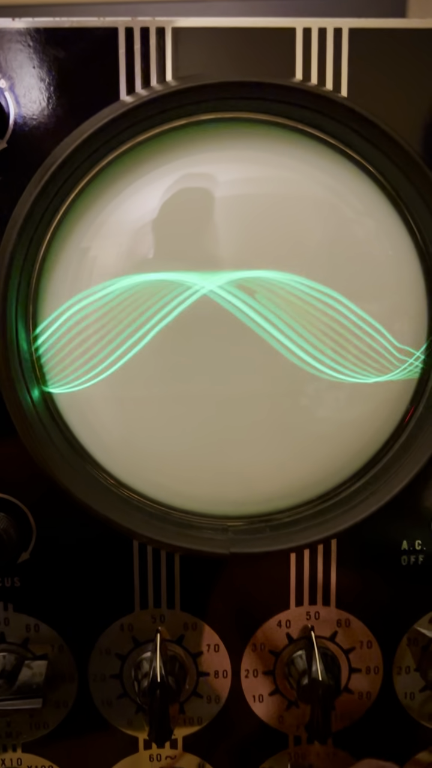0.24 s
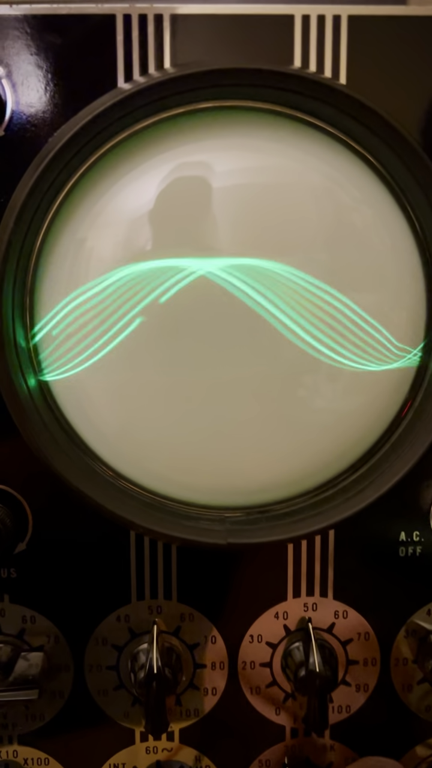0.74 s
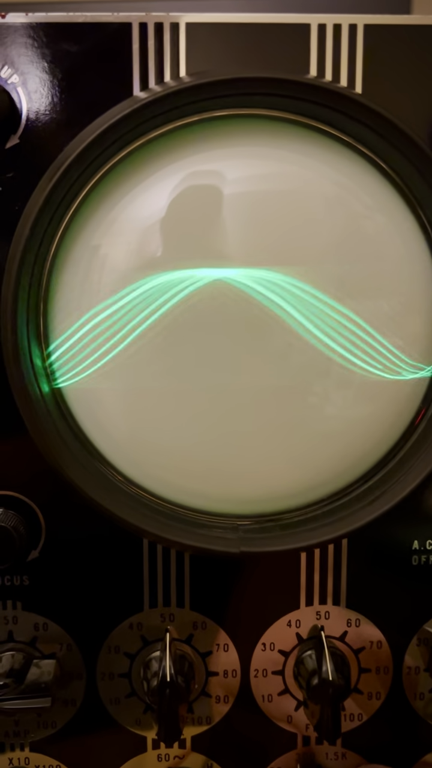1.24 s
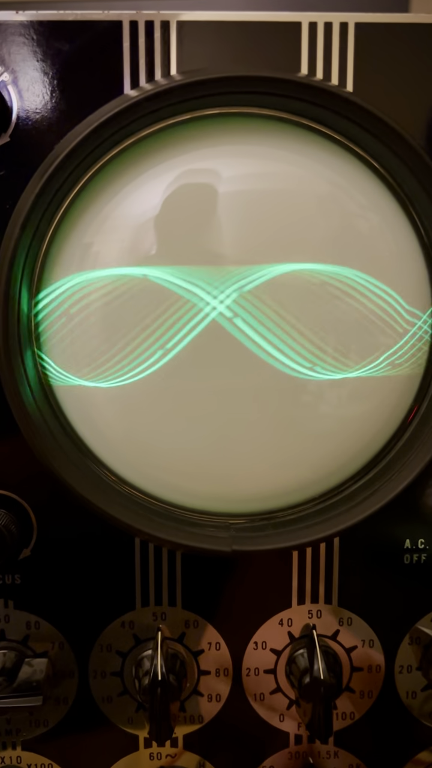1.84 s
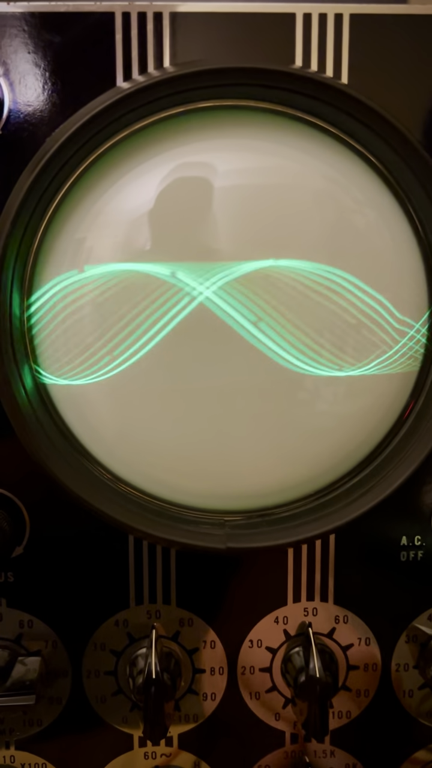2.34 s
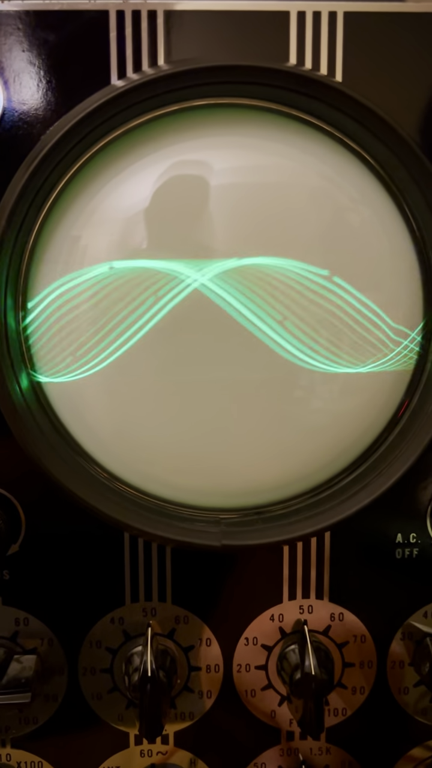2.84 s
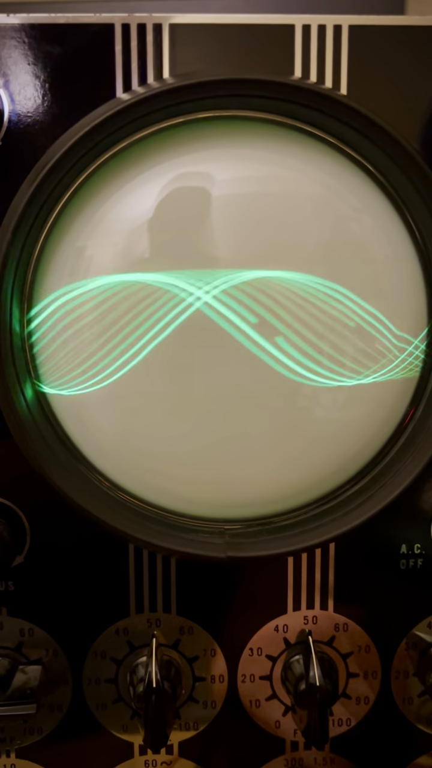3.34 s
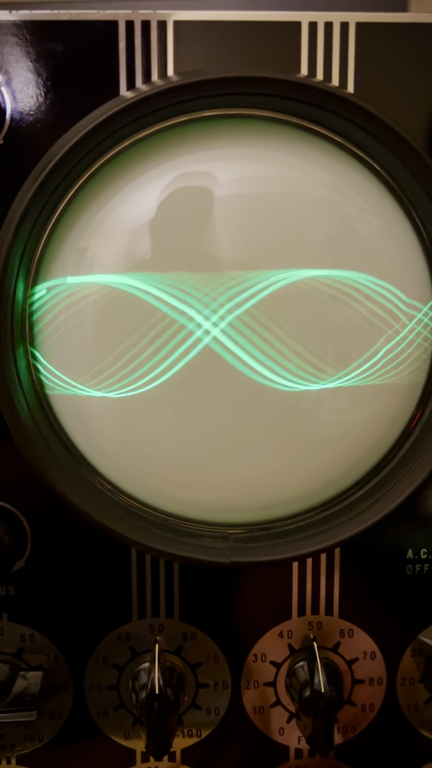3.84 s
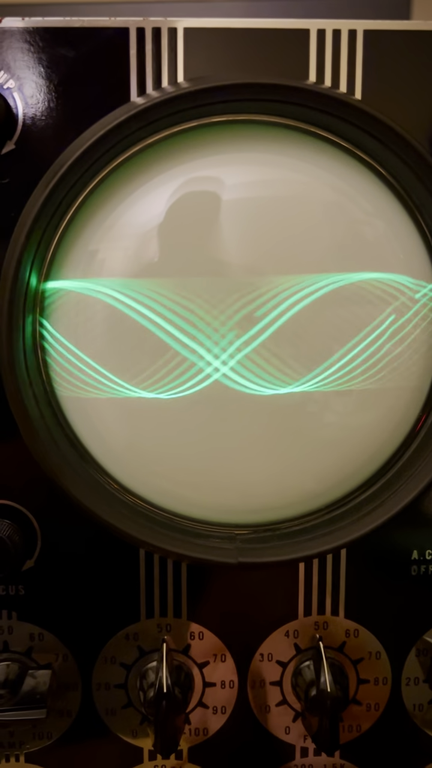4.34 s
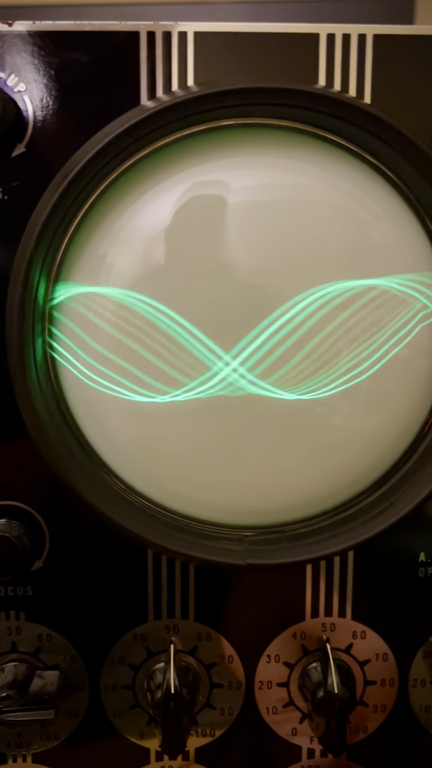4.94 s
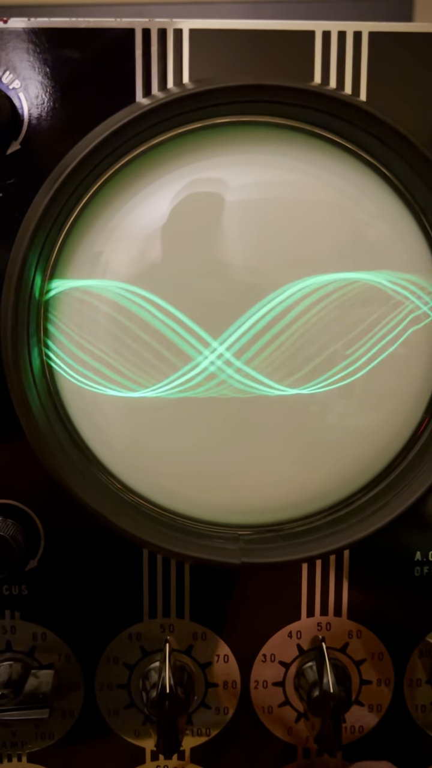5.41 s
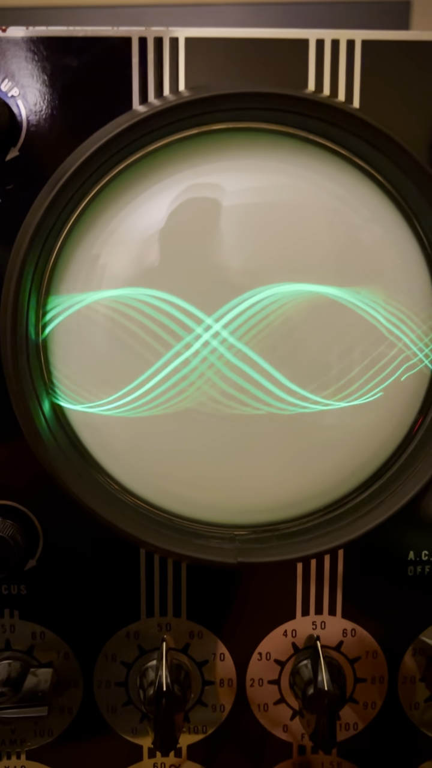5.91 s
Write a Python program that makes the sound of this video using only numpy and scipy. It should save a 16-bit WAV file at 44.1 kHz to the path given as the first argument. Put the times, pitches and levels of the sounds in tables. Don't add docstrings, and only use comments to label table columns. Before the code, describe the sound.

Close, dry clicks and hard snaps from a stubborn control knob, with faint taps, thuds and cloth rubs in a hushed indoor workshop.

```python
import sys
import numpy as np
from scipy import signal
from scipy.fft import rfft, irfft
from scipy.io import wavfile
from scipy.ndimage import uniform_filter1d

SR = 44100
rng = np.random.default_rng(int(sys.argv[2]) if len(sys.argv) > 2 else 0)


def voltage_ratio(decibels):
    exponent = np.asarray(decibels, float) / 20
    return 10 ** exponent


def wav_out(sig):
    wavfile.write(sys.argv[1], SR, np.round(np.clip(np.atleast_2d(sig).T, -1, 1) * 32767).astype(np.int16))


N = 272097

# f/Hz, level/dB per Hz
FLOOR_COLOUR = [(25, -14.5), (60, -10), (160, -5.5), (250, -9), (300, -9), (330, -23), (365, -13.5),
                (450, -32.5), (640, -26.5), (900, -37), (1300, -36), (2700, -43.5), (5000, -49),
                (7500, -47), (10500, -55.5), (13300, -56.5), (14600, -78.5)]
# t/s, level/dB
RUMBLE = [(0.0, -58), (0.38, -64.5), (0.62, -59.5), (1.13, -66), (1.58, -63.5), (2.44, -62.5), (2.71, -66),
          (2.92, -62), (3.49, -61), (3.78, -63.5), (4.78, -63), (5.57, -65.5), (6.03, -66.5), (6.17, -59)]
# t/s, level/dB
WHINE = [(0, -108), (1.5, -106), (1.8, -95), (3.0, -92), (3.4, -106), (6.17, -108)]
WHINE_HZ, HISS_DB = 7400, -76.5
# f/Hz, likeness/share
FLOOR_LIKENESS = [(60, 1), (130, 0.91), (290, 0.88), (640, -0.87), (1410, 0.35), (3100, -0.44),
                  (6820, 0.022), (15000, 0.94)]
# f/Hz, time to fall 60 dB/s
ROOM_DECAY = [(60, 0.7), (250, 0.46), (700, 0.19), (2500, 0.26), (7000, 0.2), (14000, 0.13)]
# f/Hz, likeness/share
ROOM_LIKENESS = [(60, 0.98), (180, 1), (550, 0.23), (1650, 0.99), (4970, 0.27), (15000, 0.14)]

# t/s, peak/dB, treble/dB, low body/dB, nearness to the edge/dB
TICKS = [(0.001, -53.5, -10.5, -23, -2), (0.425, -48, -13, 1.5, -1), (0.474, -47.5, -9.5, -13, 1.5),
         (0.516, -50, -11, -3, 2.5), (0.64, -47.5, -11.5, -7, 3), (0.691, -49, -12, -7.5, 1),
         (2.064, -49.5, -13, -1, 7), (3.565, -47, -13.5, -8, 2), (3.604, -51.5, -13.5, -26, 3),
         (3.681, -50, -15, -15, 1)]
# f/Hz, width/Hz, level/dB
HOUSING = [(234, 67, 9), (816, 55, 7.5), (1462, 63, -1), (1691, 40, 9), (2180, 115, -2), (2586, 24, -0.5),
           (3260, 290, -9.5), (3640, 47, 2), (4720, 73, 0), (5340, 1200, -15.5), (5870, 190, -12),
           (6660, 180, -3), (9460, 79, -11.5), (10000, 240, -32)]
EDGE_GAIN = [0, .5, 0, -1, 1, 0, .5, 0, -.7, 0, 0, -.3, 0, 0]
# f/Hz, level/dB
CLICK = [(200, 1), (500, 3.5), (1500, -12), (3300, -5.5), (5300, -12.5), (7500, -32.5), (11000, -18.5),
         (14000, -28.5), (16000, -33.5)]

# start t/s, hardest t/s, end t/s, shell level/dB,
# gritty treble against the shell/dB
CREAKS = [(0.11, 0.11, 0.175, -74, -31), (0.196, 0.39, 0.38, -74, -17), (1.454, 1.45, 1.5, -82, -20),
          (1.505, 1.67, 1.575, -55.5, -24), (1.531, 1.58, 1.61, -47, -19.5), (2.889, 3.1, 2.93, -71, -28),
          (2.919, 3.5, 3.0, -75, -13), (3.05, 3.177, 3.19, -72, -30), (3.198, 3.25, 3.235, -40, -13),
          (3.8, 3.8, 3.9, -75.5, -13.5), (3.839, 4, 4.01, -65, -28), (4.002, 4.1, 4.09, -69.5, -26),
          (4.479, 4.7, 4.525, -72.5, -19), (4.96, 6.9, 5.03, -91, -4), (4.533, 4.69, 4.63, -45, -21),
          (4.616, 4.627, 4.632, -30, -13.5), (4.977, 5.1, 5.095, -73.5, -25),
          (5.095, 5.2, 5.19, -67.5, -27), (5.19, 5.4, 5.3, -78, -19.5), (5.735, 5.83, 5.79, -49, -8.5),
          (5.767, 5.32, 5.79, -39.5, -16), (6.04, 6.09, 6.1, -55.5, -16), (6.058, 6.08, 6.15, -47.5, -23)]
# f/Hz, width/Hz, level/dB
SHELL = [(1045, 60, -8), (2430, 190, -3), (2725, 150, -4), (2110, 60, -10), (2875, 80, -13),
         (3110, 80, -19)]
# f/Hz, level/dB
HOLLOW = [(1200, -11.5), (2100, 0), (2900, -2), (3300, -7), (4200, -11)]
# f/Hz, width/Hz, level/dB
GRIT = [(4230, 120, 2), (4100, 41, -7), (6390, 170, 2), (6270, 170, -3), (6940, 990, -6.5),
        (9100, 460, -13), (10800, 68, -8), (12900, 80, -3.5), (13000, 160, -13)]
# f/Hz, level/dB
CRACK = [(300, -11.5), (700, -6.5), (1500, -7.5), (3000, -3.5), (3700, 3.5), (4500, 0), (6000, -6.5),
         (11000, -11.5), (14000, -15), (16000, -13.5)]
# f/Hz, width/Hz, level/dB
BENCH = [(55.74, 18, -15), (100, 33, -2.5), (165, 100, -8), (180, 42, -1), (272, 27, -4), (330.7, 24, -1),
         (500, 54, -9), (704, 430, -21.5), (1030, 160, -17.5), (1380, 1400, -17.5)]
# f/Hz, level/dB
KNOB_ROOM_COLOUR = [(1800, 0.5), (2430, -2.5), (3050, 2.5), (3700, 1.5), (4800, -2.5)]
REST_DB, BUILD, EASE = -95, 0.59, 0.36
PUSH_DB, PUSH_SHRINK = 1.5, 0.1
WAKE_DB, WAKE_SLOPE = -59, 4
LEAN_HZ, LEAN_SPAN_HZ = 2570, 170

# t/s, peak/dB, f/Hz
KNOCKS = [(0.125, -66.5, 500), (0.14, -58.5, 168), (0.738, -50, 61.9), (0.815, -48, 86),
          (1.076, -39, 168.7), (2.713, -46.5, 116.4), (2.877, -47.5, 165), (3.24, -45, 68.4),
          (3.38, -49, 255.3), (4, -57.5, 76.06), (4.632, -44, 100.6), (5.801, -40, 148.3),
          (5.832, -42.5, 58), (6.112, -51, 79.4)]
KNOCK_T60_S = 0.13

# start t/s, hardest t/s, end t/s, level/dB
RUBS = [(0.231, 0.262, 0.42, -78.5), (0.275, 0.42, 0.42, -76.5), (3.804, 3.842, 4.0, -96),
        (3.858, 4.018, 4.2, -87), (4.211, 4.234, 4.29, -84.5), (4.965, 5.016, 5.1, -105)]
# f/Hz, width/Hz, level/dB
RIM = [(1500, 680, -19.5), (3370, 930, -17), (4260, 140, -7), (6130, 210, -20)]
# start t/s, hardest t/s, end t/s, level/dB
DRAGS = [(3.498, 3.53, 3.55, -62), (4.232, 4.245, 4.268, -63), (4.289, 4.325, 4.4, -71)]
# f/Hz, width/Hz, level/dB
WOOD = [(523, 77, 2), (800, 140, -6.5), (1110, 130, -4.5), (1416, 170, -8), (1640, 100, -5),
        (2366, 110, -26.5)]
# f/Hz, level/dB
CLOTH = [(1700, 0), (2100, -13), (4000, -25.5)]
DRAG_BUILD, DRAG_EASE = 0.29, 0.71

# t/s, peak/dB, ring f/Hz, edge above 1 kHz/dB, thud/dB
TAPS = [(0.3717, -42, 532, -23, -16), (1.077, -50, 500, -23, 2.5), (1.46, -53.5, 360, -21, 0),
        (2.715, -53, 680, -12.5, 11), (2.82, -39.5, 340, -14.5, -11.5), (2.887, -42, 504, -9, -2),
        (2.932, -55.5, 397, -8, -21), (3.061, -43, 475, -8.5, -3.5), (4.228, -59.5, 515, -26, 8.5)]
CONTACT_MS = 0.68

# t/s, peak/dB, f/Hz
CATCHES = [(0.372, -53.5, 860), (0.375, -49.5, 1520), (3.495, -54, 590), (3.501, -56, 580),
           (3.509, -54.5, 1570), (3.527, -50, 1080), (3.536, -52, 1550), (4.234, -50, 1558),
           (4.248, -50.5, 1080), (4.29, -60, 1550), (4.311, -62.5, 1550), (4.319, -60.5, 1400),
           (4.343, -63, 1550)]
CATCH_WIDTH_HZ = 60

# t/s, peak/dB, treble crack against it/dB, thud/dB, lean to upper shell modes/dB
SNAPS = [(1.1105, -56.5, -28, -8, -5), (1.130, -51.5, -13, -2, -6), (1.459, -62, -32, 1, 6),
         (1.547, -57, -22, -14, 2), (1.569, -57, -24, -3, -2), (1.584, -44.5, -8, 3, 0),
         (1.5914, -31.5, -25, -27, 12), (1.599, -32.5, -39, -12.5, 7), (1.6066, -39, -28, -25, 1.5),
         (2.91, -52.5, -15, -3.5, 5), (3.194, -68, -52, -28, 8), (3.21, -44, -21, -22.5, 3),
         (3.2221, -32, -11, -10, -6), (3.2259, -25.5, -17, -5.5, -3), (3.2335, -27.5, -2, -6.5, -3.5),
         (3.2362, -28.5, -23, -19, -1), (4.580, -44.5, -13.5, -8, 0.5), (4.6198, -33, -29.5, -8.5, -5.5),
         (4.6252, -23.5, -26, -16.5, -1), (4.6275, -14.5, -13, -13, 0.5), (4.6294, -12, -26.5, -19, -0.5),
         (5.556, -54.5, -4, -8, -0.5), (5.7613, -39, -8, -10, -3), (5.7841, -16, -30, -27.5, 1),
         (5.779, -37.5, -12, -23.5, -4), (5.7874, -27.5, -18, -14, 1), (5.791, -30.5, -23, -5.5, 2),
         (6.062, -47.5, -11.5, -11, 2.5), (6.0929, -44, -8, -3, 5), (6.1005, -35, -13, -7.5, 4)]
SLIP_MS, SLIP_MS_PER_DB = 2.6, .04
BLOW, BLOW_SLOPE = 1.71, 0.49
GIVE_S = 0.00065

# start t/s, hardest t/s, end t/s, level/dB
SQUEAKS = [
    (1.518, 1.7, 1.59, -62),
    (3.193, 3.197, 3.205, -53.5),
    (3.208, 3.216, 3.222, -43),
    (5.742, 6.4, 5.772, -61),
    (2.907, 2.912, 2.88, -66.5),
]
# f/Hz, width/Hz, level/dB
SINGING = [(2740, 50, -4.5), (2430, 100, -8.5), (2930, 60, -10), (4250, 200, -24.5), (6800, 500, -23)]
# t/s, peak/dB, f/Hz, width/Hz
JOLTS = [(1.571, -54, 384, 50), (1.584, -44, 341, 50), (1.607, -52, 331, 40), (1.588, -47, 550, 70),
         (1.602, -50, 4600, 120), (3.2205, -37.5, 1300, 250), (3.223, -46, 1035, 40),
         (3.226, -36, 345, 44.7), (3.228, -40.5, 506, 49.6), (3.233, -47, 1740, 60),
         (3.2342, -49, 3960, 900), (3.245, -48, 1024, 50), (3.248, -42, 263, 39.5), (4.629, -40.5, 320, 25),
         (4.648, -42.5, 250, 40), (4.633, -43.5, 194.4, 30), (5.795, -44.5, 253, 30),
         (5.789, -36.5, 4450, 200)]
# start t/s, length/s, level/dB
CHATTERS = [(1.583, .005, -63.5), (3.205, .02, -74), (3.2235, 0.0045, -53), (3.23, 0.0039, -41),
            (4.602, .005, -64.5), (4.629, .007, -33), (5.771, 0.0075, -39), (6.096, 0.0054, -66)]
# f/Hz, level/dB
SPRING = [(1500, -29.5), (4000, -9.5), (6000, 0.5), (9000, -1.5), (12000, -1.5), (14000, -8.5),
          (15600, -7.5)]
# t/s, peak/dB
DROPS = [
    (1.5985, -52),
    (3.2337, -44),
    (4.6284, -13),
    (4.6308, -29),
    (4.6335, -30),
]
# f/Hz, width/Hz, level/dB
NOTCH = [(1050, 50, 0), (4180, 200, -14), (4770, 160, -9), (5940, 130, 0), (6800, 200, -6), (7440, 300, -7),
         (8460, 250, -10), (9700, 300, -8), (10250, 220, -6), (11830, 260, -4), (13000, 260, -9)]

# f/Hz, phase/radians
PORTS = [(100, 0), (800, .45), (1550, .1), (2330, -.9), (2620, -.6), (2900, .3), (3300, -2.2), (3900, -2.3),
         (4500, -1.6), (5200, .9), (7700, 1.4)]
BASS_CUT_HZ, TOP_CUT_HZ = 52, 15950


def evened(x):
    return x / np.sqrt(np.mean(x ** 2) + 1e-20)


def peaked(x):
    return x / (abs(x).max() + 1e-20)


def read(points, hz):
    f, value = np.transpose(points)
    return np.interp(np.log(hz + 1), np.log(f + 1), value)


def add(mix, s, sound):
    part = mix[..., max(round(s * SR), 0):][..., :sound.shape[-1]]
    part += sound[..., :part.shape[-1]]


def ring(force, modes, spread=1.01):
    out = 0
    for k, (hz, width, db) in enumerate(modes):
        pole = np.exp((-np.pi * width + 2j * np.pi * min(hz * spread, 20000)) / SR)
        gain = (-1) ** k * voltage_ratio(db) * 2 * (1 - np.exp(-np.pi * width / SR))
        out = out + gain * signal.lfilter([1], [1, -pole], force + 1e-18).imag
    return out


def coloured(x, points):
    log_gain = read(points, np.arange(1025) * SR / 2048) * np.log(10) / 20
    folded = irfft(log_gain) * np.r_[1, 2 * np.ones(1023), 1, np.zeros(1023)]
    taps = irfft(np.exp(rfft(folded)))[:1024]
    return signal.fftconvolve(x, taps)[:len(x)]


def slips(size, per_s, uneven_db):
    sign, chance, strength = rng.random((size, 3)).T
    happens = chance < per_s / SR
    return np.sign(sign - .5) * happens * voltage_ratio(-uneven_db * np.log(strength + 0.0031))


def stroke(start, hardest, end, db, build, ease):
    t = np.arange(start, max(end, start + .01), 1 / SR)
    height_db = db - REST_DB
    times = [start, max(hardest, start), max(end, hardest)]
    level_db = np.interp(t, times, [db - build * height_db, db, db - ease * height_db])
    return voltage_ratio(level_db) * signal.windows.tukey(len(t), .1)


def air(frames, hop, likeness):
    hz = np.fft.rfftfreq(4 * hop, 1 / SR)
    a, b, c, d = rng.standard_normal((frames, len(hz), 4)).T
    same = np.clip(read(likeness, hz), -1, 1)[:, None]
    left = a + 1j * b
    right = same * left + np.sqrt(1 - same ** 2) * (c + 1j * d)
    return hz[:, None], np.array([left, right])


def floor():
    hz, z = air(N // 512 + 5, 512, FLOOR_LIKENESS)
    patches = rng.standard_normal((z.shape[2], len(hz))).T
    patches = evened(uniform_filter1d(uniform_filter1d(patches, 6, 0), 5, 1))
    z = z * voltage_ratio(read(FLOOR_COLOUR, hz) + 1.1 * patches)
    rumble = evened(signal.istft(z * (hz < 430), nperseg=2048, noverlap=1536)[1][:, :N])
    hiss = evened(signal.istft(z * (hz >= 430), nperseg=2048, noverlap=1536)[1][:, :N])
    whine = evened(ring(rng.standard_normal(N), [(WHINE_HZ, 40, 0)], spread=1))
    t = np.arange(N) / SR
    rumble_db = np.interp(t, *np.transpose(RUMBLE))
    whine_db = np.interp(t, *np.transpose(WHINE))
    return rumble * voltage_ratio(rumble_db) + hiss * voltage_ratio(HISS_DB) + whine * voltage_ratio(whine_db)


def tick(s, db, treble_db, low_db, edge_db):
    t = np.arange(8000) / SR
    force = voltage_ratio(-35.0) * slips(8000, per_s=4200.0, uneven_db=-2.5) * np.exp(-t / 0.0099)
    force[0] += 2.5
    modes = [(hz, width, mode_db + share * edge_db + rng.uniform(-3, 3))
             for (hz, width, mode_db), share in zip(HOUSING, EDGE_GAIN)]
    housing = ring(force, modes, spread=rng.uniform(.994, 1.006))
    click = coloured(force, CLICK) + voltage_ratio(0.9) * housing
    brightness = [(3000, 0), (5000, treble_db + 11.0), (12000, treble_db + 8.0), (16000, treble_db + 4.5)]
    click = peaked(coloured(click, brightness))
    low_body = peaked(ring(force, BENCH, spread=1.107))
    return s, voltage_ratio(db) * (click + voltage_ratio(low_db - 12.0) * low_body)


def room(x):
    hz, z = air(400, 64, ROOM_LIKENESS)
    t = np.arange(400) * 64 / SR
    tail = signal.istft(z * voltage_ratio(-60 * t / read(ROOM_DECAY, hz)), nperseg=256, noverlap=192)[1]
    tail *= np.minimum(np.arange(tail.shape[1]) / SR / 0.0028, 1)
    return signal.fftconvolve(x[None], tail / np.linalg.norm(tail[0]), axes=1)[:, :N]


def knob_parts(force, effort_db, lean_db=0):
    asleep_db = np.clip(WAKE_SLOPE * (effort_db - WAKE_DB), -16, 0)
    modes = []
    for k, (hz, width, db) in enumerate(SHELL):
        lean = lean_db * np.clip((hz - LEAN_HZ) / LEAN_SPAN_HZ, -1, 1)
        modes.append((hz, width, db + asleep_db * (k != 1) + lean))
    hollow = coloured(force, HOLLOW)
    shell = np.array([ring(hollow, modes, spread=.998), ring(hollow, modes, spread=1.002)])
    crack = coloured(force, CRACK) + voltage_ratio(-5.0) * ring(force, GRIT, spread=1.0)
    bench = ring(uniform_filter1d(force, size=16), BENCH)
    return shell, np.array([crack, crack]), np.array([bench, bench])


def into_room(shell, crack, bench):
    return voltage_ratio(-17.5) * shell[1] + voltage_ratio(-0.5) * crack[1] + voltage_ratio(-4.5) * bench[1]


def creak(start, hardest, end, db, grit_db):
    turning = voltage_ratio(-2.5) * stroke(start, hardest, end, db, BUILD, EASE)
    force = signal.lfilter([1], [1, -.6], slips(len(turning), per_s=4100.0, uneven_db=2))
    shell, crack, bench = knob_parts(force, db)
    push_db = PUSH_DB - PUSH_SHRINK * (db + 64.0)
    shell = turning * evened(shell)
    crack = turning * voltage_ratio(grit_db + 12.0) * evened(crack)
    bench = turning * voltage_ratio(push_db) * evened(bench)
    return start, shell + crack + bench, into_room(shell, crack, bench)


def knock(s, db, hz):
    t = np.arange(12000) / SR
    swell = (1 - np.exp(-t / 0.0092)) ** 2
    return s, voltage_ratio(db) * peaked(np.sin(2 * np.pi * hz * t) * swell * voltage_ratio(-60 * t / KNOCK_T60_S))


def drag(row, modes, per_s):
    effort = stroke(*row, DRAG_BUILD, DRAG_EASE)
    force = slips(len(effort), per_s, uneven_db=3.0)
    return row[0], effort * evened(ring(force, modes, spread=0.99))


def tap(s, db, hz, edge_db, thud_db):
    t = np.arange(6000) / SR
    soft = 1 - np.exp(-(t / 0.00028) ** 2)
    edge_turns = 1150 * t + 2100 * 0.00108 * (1 - np.exp(-t / 0.0012))
    edge = np.sin(2 * np.pi * edge_turns) * np.exp(-t / 0.0053) * soft
    nail = voltage_ratio(-15.0) * np.sin(2 * np.pi * 5700 * t) * np.exp(-t / 0.0025) * soft
    late = np.maximum(t - CONTACT_MS / 1000, 0)
    body_turns = hz * (.85 * late + 0.9 * 0.002 * (1 - np.exp(-late / 0.0026)))
    body = np.sin(2 * np.pi * body_turns) * np.exp(-late / 0.0081) * (1 - np.exp(-late / 0.00067))
    shell = voltage_ratio(1.0) * np.sin(2 * np.pi * 2400 * t) * np.exp(-t / 0.0035) * (1 - np.exp(-t / 0.0012))
    push = np.exp(-((t - .003) / 0.001) ** 2)
    thud = peaked(ring(push, BENCH, spread=rng.uniform(.93, 0.95)))
    return s, voltage_ratio(db) * (body + voltage_ratio(edge_db) * (edge + nail + shell) + voltage_ratio(thud_db) * thud)


def catch(s, db, hz):
    force = np.zeros(3000)
    force[:8] = np.hanning(8)
    plank = ring(force, [(hz, CATCH_WIDTH_HZ, 0)], spread=0.98)
    others = coloured(ring(force, WOOD, spread=1), CLOTH)
    return s, voltage_ratio(db) * peaked(plank + voltage_ratio(-9.0) * others)


def snap(s, db, crack_db, thud_db, lean_db):
    t = np.arange(6000) / SR
    ms = max(SLIP_MS - SLIP_MS_PER_DB * (db + 43.0), .2)
    envelope = np.exp(-t * 1000 / ms * 2.5) * (1 - np.exp(-t / GIVE_S))
    force = voltage_ratio(-1.0) * slips(6000, per_s=17000.0, uneven_db=0.0) * envelope
    force[0] += BLOW * voltage_ratio(BLOW_SLOPE * (db + 13))
    shell, crack, bench = knob_parts(force, db - 11.0, lean_db)
    shell = voltage_ratio(db) * peaked(shell)
    crack = voltage_ratio(db + crack_db) * peaked(crack)
    bench = voltage_ratio(db + thud_db) * peaked(bench)
    return s, shell + crack + bench, into_room(shell, crack, bench)


def jolt(s, db, hz, width):
    t = np.arange(6000) / SR
    swing = np.sin(2 * np.pi * hz * t) * (1 - np.exp(-t * hz)) * np.exp(-np.pi * width * t)
    sound = voltage_ratio(db) * peaked(swing)
    return s, np.array([sound, sound]), voltage_ratio(-8) * sound


def chatter(s, length, db):
    t = np.arange(4000) / SR
    envelope = np.exp(-(t / length) ** 2) * (1 - np.exp(-t / .0012))
    sound = coloured(slips(4000, per_s=6900.0, uneven_db=2.5) * envelope, SPRING)
    sound = voltage_ratio(db) * sound / np.sqrt(np.sum(sound ** 2) / (length * SR))
    return s, np.array([sound, sound]), voltage_ratio(-4.0) * sound


def drop(s, db):
    force = np.zeros(3000)
    force[0] = 1
    contact = coloured(force, [(3000, -25.0), (9000, 3.0), (13000, -2), (16000, -17)])
    sound = voltage_ratio(db) * peaked(ring(force, NOTCH, spread=0.97) + voltage_ratio(-15.0) * contact)
    return s, np.array([sound, sound]), voltage_ratio(-15) * sound


def scene():
    knob = np.zeros((2, N))
    far, knob_to_room, other, panel, bright = np.zeros((5, N))
    for row in TICKS:
        add(far, *tick(*row))
    for source, table in [(creak, CREAKS), (snap, SNAPS), (jolt, JOLTS), (drop, DROPS)]:
        for row in table:
            s, direct, to_room = source(*row)
            add(knob, s, direct)
            add(knob_to_room, s, to_room)
    for row in KNOCKS:
        add(knob, *knock(*row))
    for row in RUBS:
        add(other, *drag(row, RIM, per_s=7800.0))
    for row in TAPS:
        add(panel, *tap(*row))
    for row in CATCHES:
        add(other, *catch(*row))
    for row in SQUEAKS:
        add(other, *drag(row, SINGING, per_s=3300.0))
    for row in DRAGS:
        s, sound = drag(row, WOOD, per_s=800.)
        add(other, s, coloured(sound, CLOTH))
    panel_to_room = coloured(panel, [(400, -2.5), (1200, -7), (2500, -12)])
    mix = floor() + voltage_ratio(5.5) * far + voltage_ratio(17) * room(far)
    mix += knob + room(coloured(knob_to_room, KNOB_ROOM_COLOUR))
    mix += panel + room(panel_to_room)
    mix += voltage_ratio(1.0) * other + voltage_ratio(-1.0) * room(other)
    for row in CHATTERS:
        s, direct, to_room = chatter(*row)
        add(mix, s, direct)
        add(bright, s, to_room)
    return mix + room(bright)


def low_pass(x):
    return signal.sosfilt(signal.butter(12, 16640, fs=SR, output="sos"), x)


def record(dry):
    hz = np.arange(N // 2 + 1) * SR / N + .1
    microphone = 1 / np.sqrt((1 + (BASS_CUT_HZ / hz) ** 4) * (1 + (hz / TOP_CUT_HZ) ** 90))
    microphone = microphone * np.exp([[-.5j], [.5j]] * read(PORTS, hz))
    return low_pass(irfft(rfft(dry) * microphone, N))


dry = scene()
out = record(dry)
wav_out(out)
```